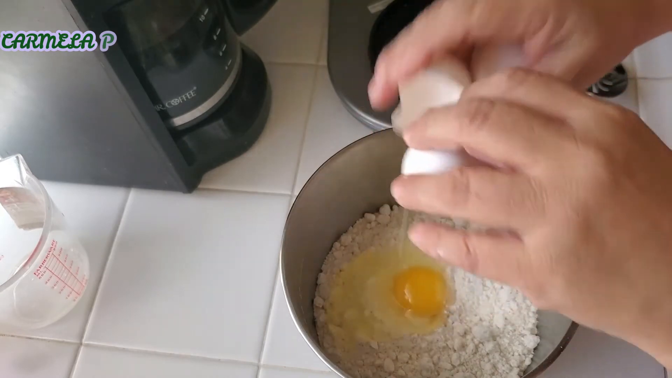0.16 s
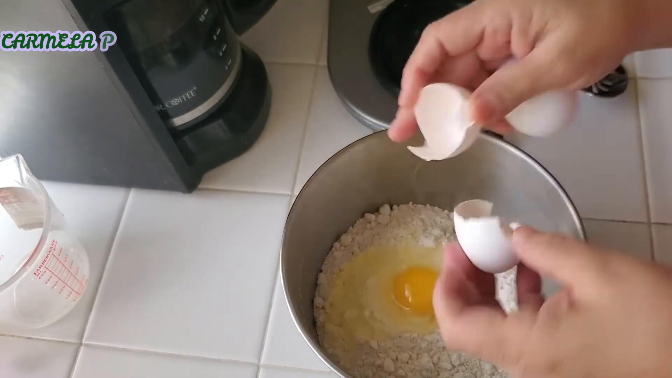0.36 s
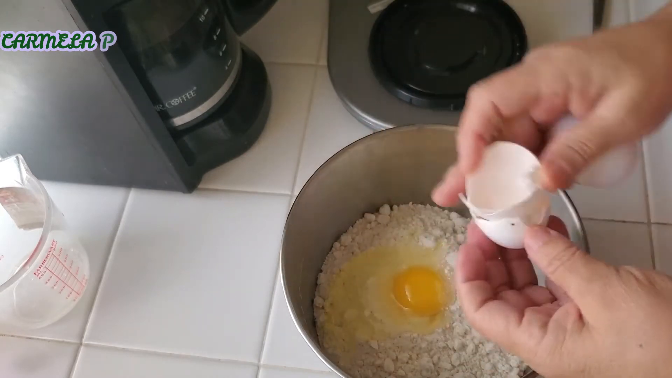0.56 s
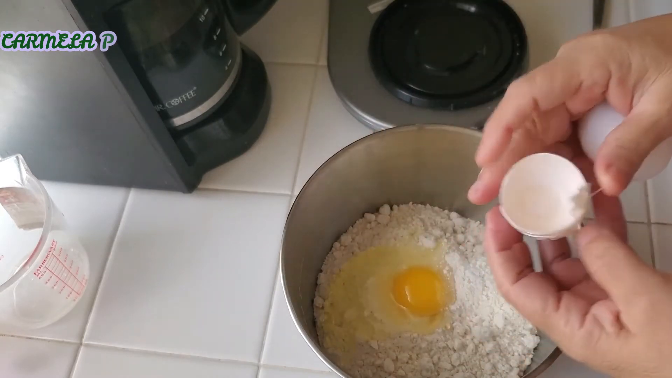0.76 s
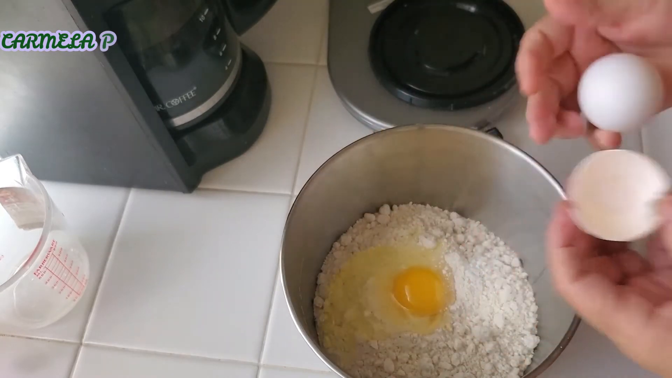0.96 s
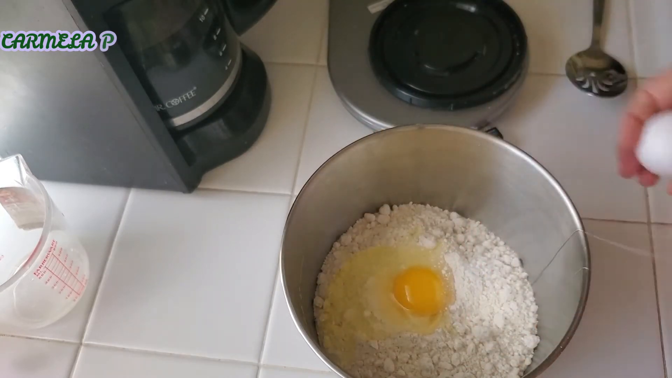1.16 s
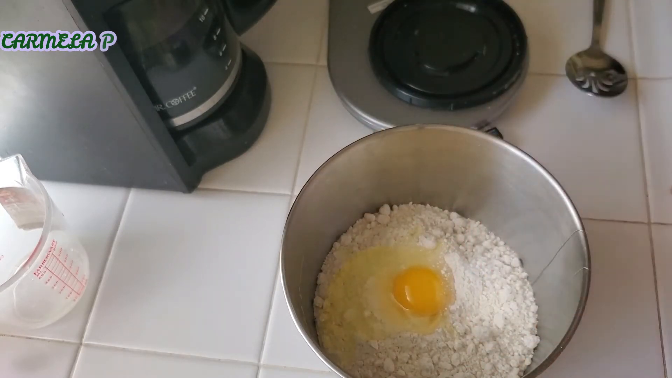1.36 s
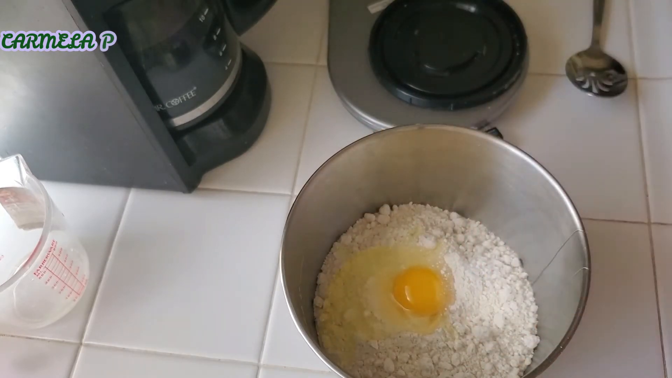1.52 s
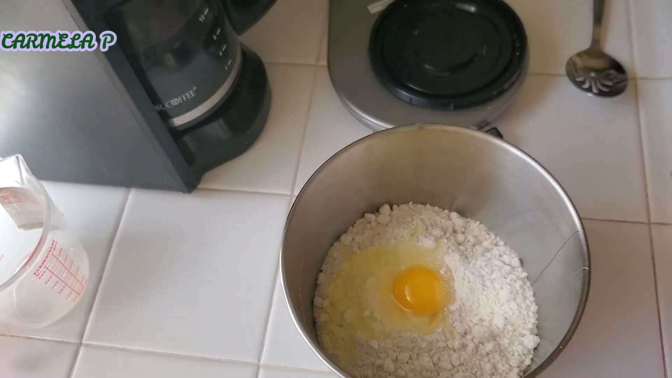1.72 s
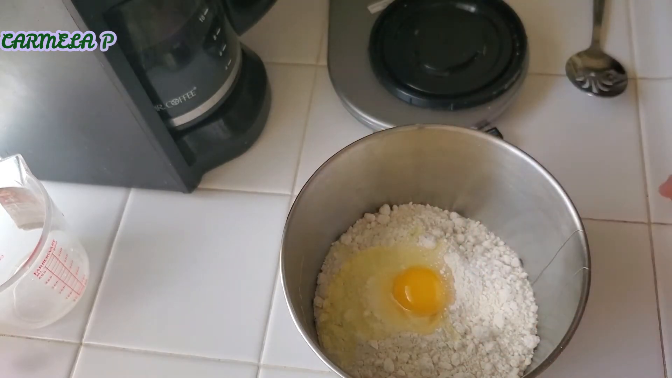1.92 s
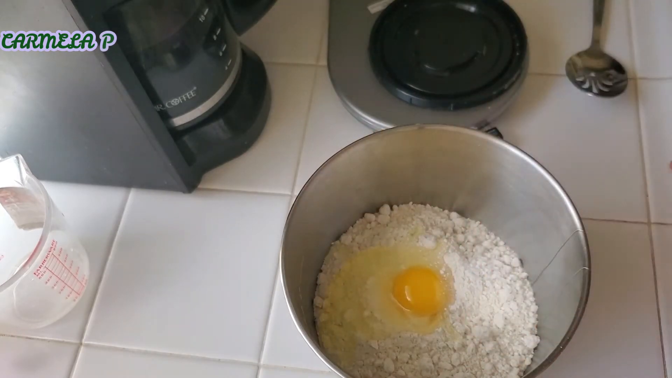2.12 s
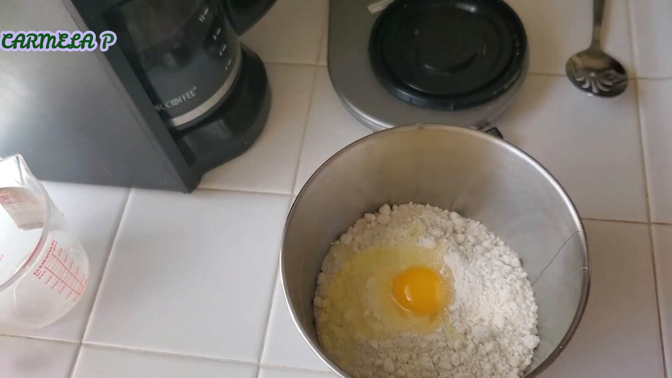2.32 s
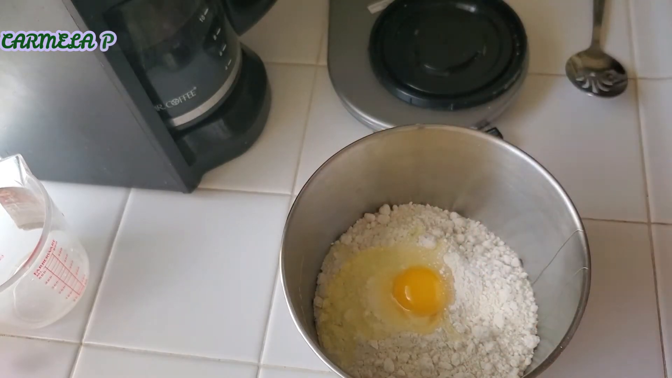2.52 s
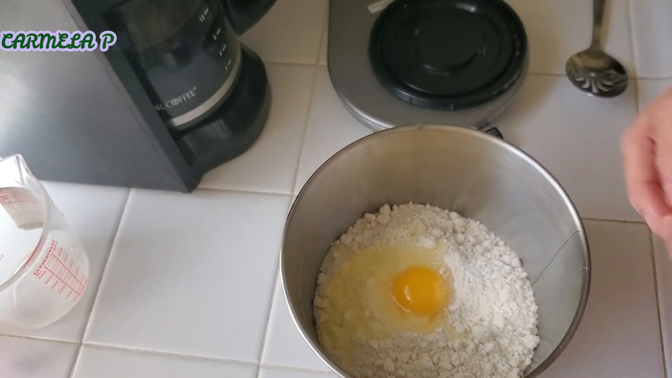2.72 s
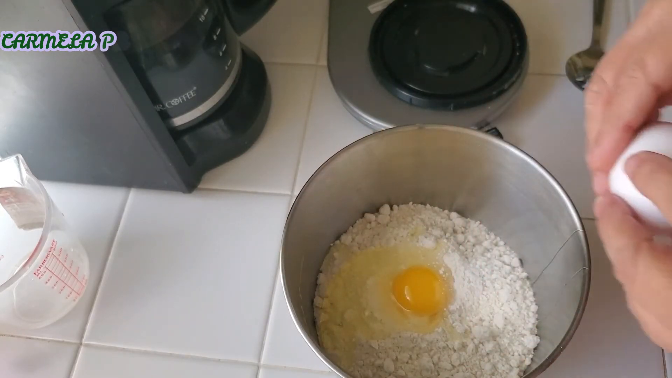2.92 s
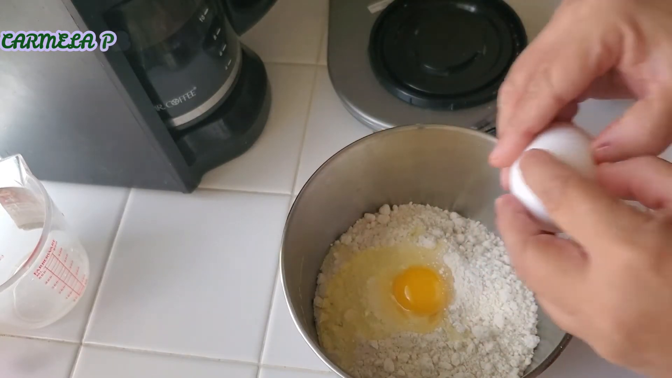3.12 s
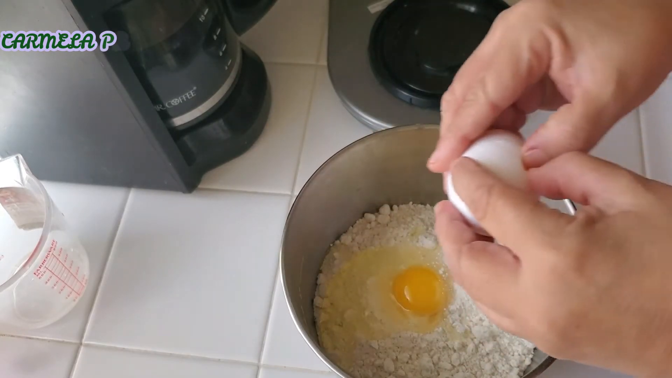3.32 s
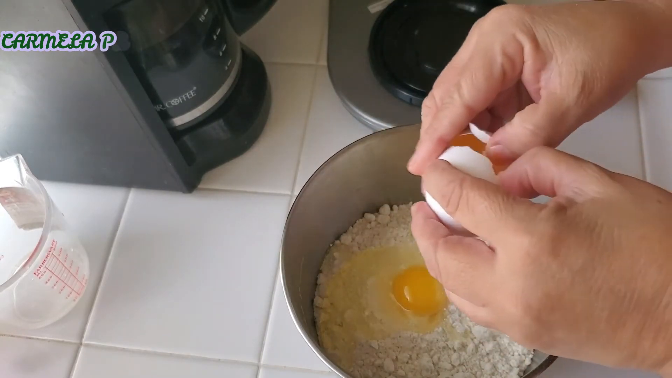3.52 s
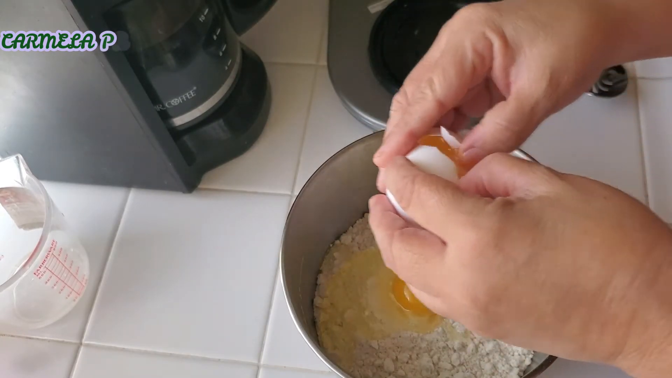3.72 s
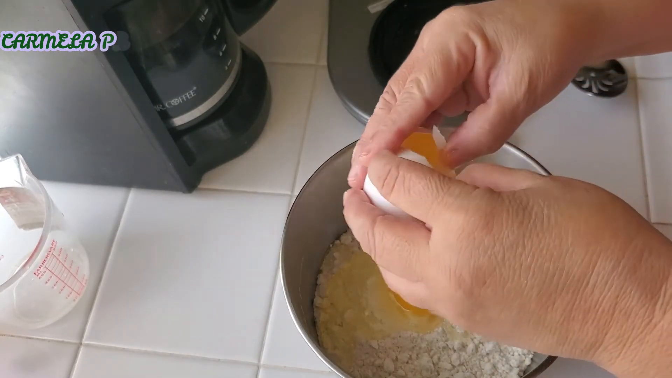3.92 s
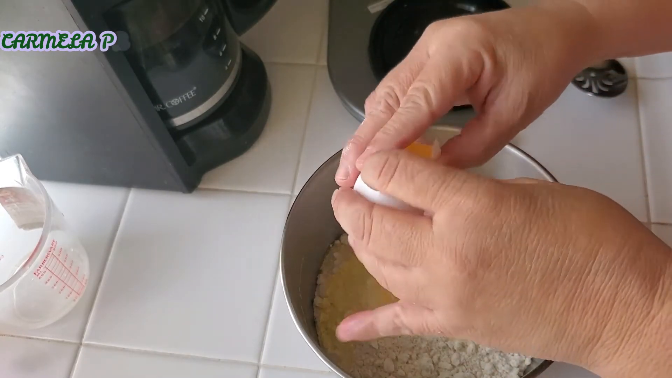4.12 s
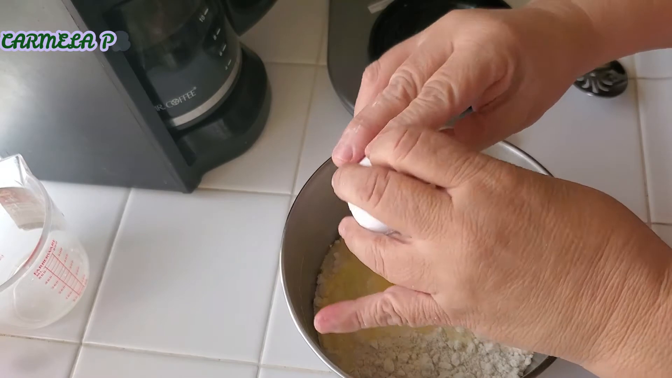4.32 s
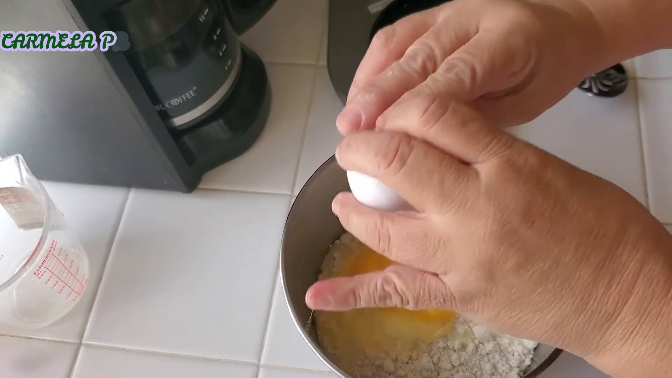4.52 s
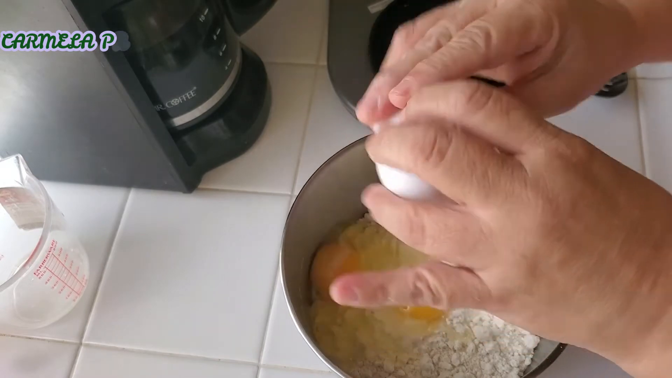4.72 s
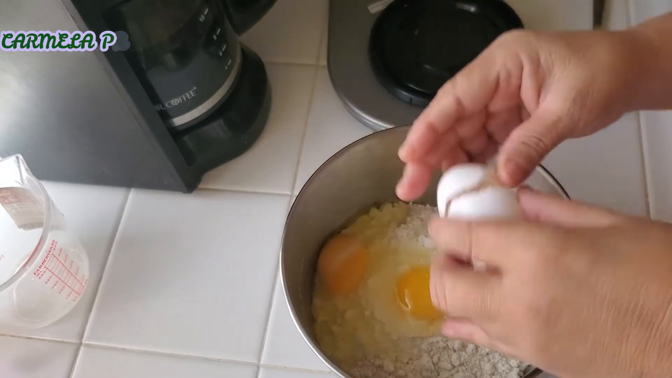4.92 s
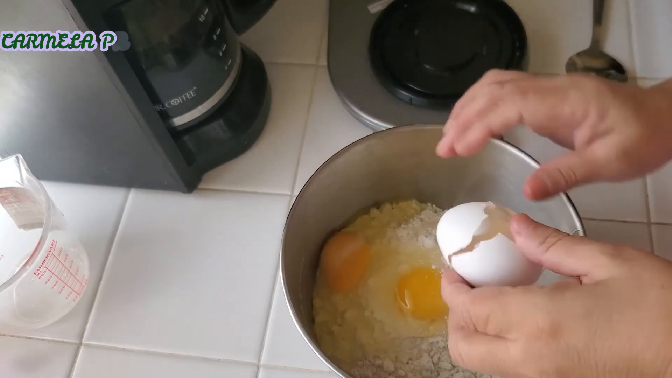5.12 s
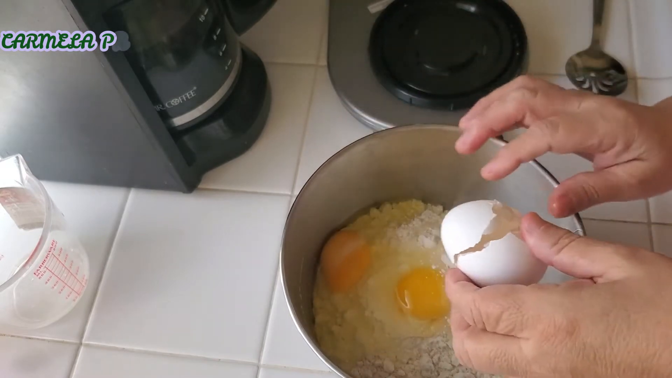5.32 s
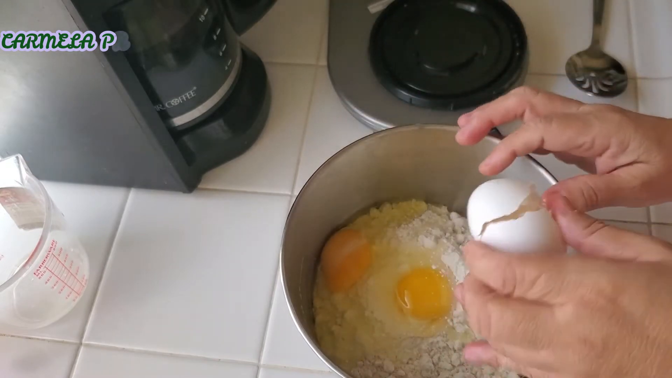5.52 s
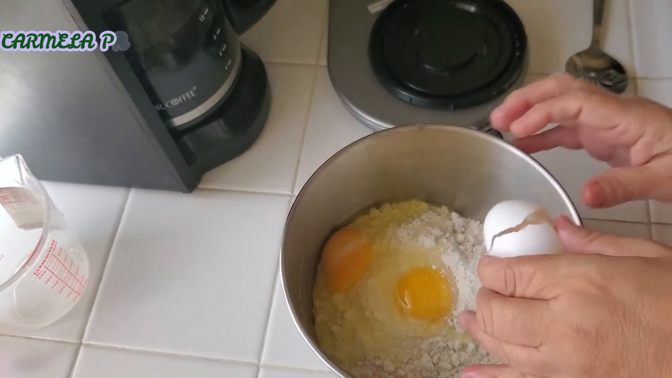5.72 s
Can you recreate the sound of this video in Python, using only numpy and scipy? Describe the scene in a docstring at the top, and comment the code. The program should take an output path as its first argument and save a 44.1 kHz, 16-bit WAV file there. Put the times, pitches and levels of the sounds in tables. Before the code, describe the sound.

An eggshell snaps, a fresh egg is knocked on the counter four times, then pried open with brittle crackling and soft finger rubbing.

```python
"""Sharp, hollow eggshell cracks, dull knocks and a soft rubbing of skin in a small tiled kitchen.
Hands break eggs over a bowl of flour: an empty shell is put down, a fresh egg is knocked on the counter
beside the microphone, then prised open. Short noise bursts excite resonances of shell, air and counter;
decaying noise gives the tiles' answer. Shaped noise makes rubbing, rumble and hiss; a sine the mains hum."""
import sys
import numpy as np
from scipy import signal
from scipy.fft import rfft, irfft, next_fast_len
from scipy.io import wavfile
from scipy.ndimage import uniform_filter1d, map_coordinates

SR = 44100
rng = np.random.default_rng(int(sys.argv[2]) if len(sys.argv) > 2 else 0)


def output_pcm(signal):
    """Save a mono or channel-first signal as 16-bit PCM at the path in sys.argv[1].

    Samples are clipped to [-1, 1] before scaling.
    """
    pcm = np.clip(np.atleast_2d(signal).T, -1, 1) * 32767
    wavfile.write(sys.argv[1], SR, np.round(pcm).astype(np.int16))


N = 254016  # samples in the scene
SPAN = 2 ** 15  # samples computed for one impact and its echo
CRACK_ECHO_DB = -2.5  # room against the direct sound of cracks and crackle

# correlation of left and right in the background noise: frequency_hz, likeness (1 = identical)
NOISE_LIKENESS = [(60, .92), (130, 0.86), (290, 0.61), (640, 0), (1400, 0)]


def amp(db):
    """Level to amplitude: 20 dB is a factor of ten."""
    return 10 ** (np.asarray(db) / 20)


def unit(x):
    """Normalization to a root mean square of one."""
    return x / np.sqrt(np.mean(x ** 2) + 1e-20)


def along(points, hz):
    """Interpolation of (frequency_hz, value) points on a logarithmic frequency axis."""
    f, v = np.transpose(points)
    return np.interp(np.log(hz + 1), np.log(f + 1), v)


def wobble(rate):
    """Slow random modulation: a smooth curve through rate Gaussian knots a second."""
    knots = rng.standard_normal(int(N * rate / SR) + 4)
    return map_coordinates(knots, [np.arange(N) * rate / SR])


def filtered(x, response):
    """Linear filtering: the spectrum of x times a response of frequency."""
    m = next_fast_len(x.shape[-1] + 8192)
    spectrum = rfft(x, m) * response(np.fft.rfftfreq(m, 1 / SR))
    return irfft(spectrum, m)[..., :x.shape[-1]]


def ring(f, modes):
    """Modal superposition: damped resonances (pitch_hz, width_hz, level_db) of alternating sign."""
    total = 0
    for k, (c, width, db) in enumerate(modes):
        resonance = 1j * f * width / (c * c - f * f + 1j * f * width)
        total = total + (-1) ** k * amp(db) * resonance
    return total


def paired(pair, spectrum, likeness):
    """Interchannel coherence: two unrelated noises mix as mid and side to a set left-right correlation."""
    turn = lambda f: np.arccos(np.clip(along(likeness, f), -1, 1)) / 2
    weights = lambda f: amp(along(spectrum, f)) * [np.cos(turn(f)), np.sin(turn(f))]
    mid, side = filtered(pair, weights)
    return np.array([mid + side, mid - side])


def hiss():
    """Stationary broadband noise: a random signal shaped by a spectrum, most alike left and right in the bass."""
    # background spectrum: frequency_hz, density_db (per Hz, relative)
    noise_spectrum = [(60, -25.5), (110, -5.5), (182, -14), (260, -18.5), (358, -25), (553, -37),
                      (1010, -39.5), (2600, -46.5), (4000, -57), (6800, -47.5), (9000, -62), (16500, -64.5)]
    noise = unit(paired(rng.standard_normal((2, N)), noise_spectrum, NOISE_LIKENESS))
    return amp(-65 + 1.5 * wobble(4.3)) * noise


def rumble():
    """Band-limited noise: a narrow bass band whose level rises and falls."""
    # course of the low rumble: time_s, level_db
    rumble_course = [(0, -69.5), (0.602, -72.5), (1.2, -61.5), (2.6, -68.5), (3.698, -68), (4.5, -61.5),
                     (5.28, -67.5), (5.55, -64.5), (5.72, -53)]
    s, level_db = np.transpose(rumble_course)
    band = [(20, -28.0), (55, 4), (95, -4), (130, -33.5)]  # frequency_hz, level_db
    noise = unit(paired(rng.standard_normal((2, N)), band, NOISE_LIKENESS))
    swell_db = np.interp(np.arange(N) / SR, s, level_db) + 0.83 * wobble(9)
    return amp(swell_db) * noise


def hum():
    """Frequency modulation: the mains tone is a sine whose pitch and level waver."""
    # mains hum: pitch_hz, level_db, width_hz (scales the pitch drift)
    hum_tone = (119.6, -62, 6)
    hz, db, width = hum_tone
    phase = 2 * np.pi * np.cumsum(hz + 0.18 * width * wobble(1.8)) / SR
    tone = np.sqrt(2) * amp(db + 1.5 * wobble(8.8)) * np.sin(phase)
    return tone * amp([[.3], [-.3]])  # slightly louder on the left


def strokes(quicker=1):
    """Exponential envelopes: gains of swish, hollow and crackle, their strokes summed as energies."""
    # finger strokes on the shell: start_s, length_s, swish_db, hollow_db, crackle_db
    finger_strokes = [(0.515, .05, -96, -76, -88), (0.568, 0.053, -78.5, -56, -51.5),
                      (0.654, 0.14, -81, -78, -76.5), (1.02, 0.069, -63, -71.5, -90),
                      (1.081, 0.11, -55, -61, -93), (1.226, 0.12, -62.5, -66.5, -96.5),
                      (1.7, 0.43, -66, -64.5, -98.5), (2.3, .3, -66.5, -63.5, -96.5),
                      (2.88, 0.049, -72, -74, -101), (3.48, 0.12, -85, -73.5, -55),
                      (3.72, 0.091, -72, -72, -74), (3.86, 0.14, -64, -55.5, -55.5),
                      (4.3, 0.19, -70, -68.5, -60.5), (4.55, 0.4, -71, -71, -63),
                      (4.82, 0.099, -60.5, -60, -62), (5.14, 0.074, -67.5, -96, -72),
                      (5.438, 0.23, -71, -85, -98)]
    swell, fade = quicker * 251.5, quicker * 148.5  # dB per second
    t = np.arange(N) / SR
    energy = 0
    for s, length, *levels_db in finger_strokes:
        shape_db = -swell * np.clip(s - t, 0, None) - fade * np.clip(t - s - length, 0, None)
        energy = energy + amp(shape_db + np.array(levels_db)[:, None]) ** 2
    return np.sqrt(energy)


def rub():
    """Sliding friction: skin moves on shell in uneven grains, and part of it sounds the air in the halves."""
    # sliding skin: frequency_hz, density_db (per Hz, relative)
    swish_spectrum = [(880, -29), (1500, -18), (3690, -3.5), (6000, -5), (6630, -1), (8080, -9),
                      (14900, -6.5), (16000, -12.5)]
    # air in the shell halves: pitch_hz, width_hz, level_db (the response is squared below)
    cup_modes = [(1455.3, 2000, 3), (2040, 2400, 2)]
    swish_gain, hollow_gain, _ = strokes()
    grains = lambda depth_db: rng.standard_normal((2, N)) * amp(depth_db * wobble(37))
    swish = unit(filtered(grains(depth_db=0.8), lambda f: amp(along(swish_spectrum, f))))
    hollow = unit(filtered(grains(depth_db=1.5), lambda f: ring(f, cup_modes) ** 2))
    return swish_gain * swish + hollow_gain * hollow


def tiles():
    """Frequency-dependent reverberation: stereo noise decays at its own speed in each band; a spectrum."""
    # reverberation of the room: frequency_hz, t60_s
    decay_times = [(80, 0.57), (200, 0.16), (530, 0.28), (1400, 0.28), (3700, 0.28), (9700, 0.18)]
    # correlation of left and right in the echo: frequency_hz, likeness
    echo_likeness = [(60, 1), (125, .93), (250, 0.95), (500, 0.59), (1000, -0.11), (2000, 0.2),
                     (8000, -0.22)]
    hz, t, z = signal.stft(rng.standard_normal((2, SPAN // 2)), SR, nperseg=256)
    t60 = np.clip(along(decay_times, hz), .05, 2)[:, None]
    tail = signal.istft(z * amp(-60 * t / t60), SR, nperseg=256)[1]
    tail = paired(tail, [(70, -5), (220, 0)], echo_likeness)  # a small room gives back little bass
    late = np.pad(tail / np.linalg.norm(tail[0]), ((0, 0), (90, 0)))  # starts 90 samples after the direct sound
    return rfft(late[:, :SPAN // 2], SPAN)


def crackle():
    """Poisson-like impulses: countless small cracks under the fingers, each favouring one resonance."""
    # ring of small cracks: pitch_hz, width_hz, level_db
    chip_modes = [(1520, 67, 0), (2090, 83, -3.5), (3624, 210, -7.5), (6700, 900, -5.5)]
    rate, spread_db = 270, 7.5  # cracks a second, scale of their random size
    chance, size = rng.random(N), np.clip(rng.exponential(size=N), 0, 3.5)
    pick = rng.integers(len(chip_modes), size=N)
    ticks = (chance < rate / SR) * amp(spread_db * size)
    chips = 0
    for k, mode in enumerate(chip_modes):
        share = np.where(pick == k, 1, .25)
        chips = chips + filtered(ticks * share, lambda f: ring(f, [mode]))
    chips = unit(chips) * strokes(quicker=4)[2]  # cracking starts and stops more abruptly than the slide
    echo = signal.fftconvolve(chips[None], irfft(tiles()), axes=1)[:, :N]
    return chips + amp(CRACK_ECHO_DB) * echo


def add(out, s, layers, length, lag, pan_db, echo):
    """Source-filter excitation: a burst of tiny fractures drives each (level_db, response); the room answers."""
    u = np.arange(8192) / SR / max(length, 2e-4)
    fractures = rng.standard_normal(len(u)) * amp(3.5 * rng.standard_normal(len(u)))
    push = rfft(fractures * np.sqrt(u) * np.exp(-2 * u), SPAN)
    # fractures push all frequencies alike
    push = push / np.sqrt(uniform_filter1d(np.abs(push) ** 2, size=150) + 1e-9)
    f = np.fft.rfftfreq(SPAN, 1 / SR)
    sound = 0
    for db, response in layers:
        layer = push * response(f)
        level = np.sqrt(SR / 200 / np.mean(np.abs(layer) ** 2))  # 0 dB: the energy of unit rms over 5 ms
        sound = sound + amp(db) * layer * level
    delay = np.exp(-2j * np.pi * f * np.array([[lag], [0]]))  # the left port hears later
    direct = amp([[pan_db / 2], [-pan_db / 2]]) * delay
    heard = irfft(sound * (direct + echo))
    heard[:, -SPAN // 4:] = 0
    start = round(s * SR)
    out[:, start:start + SPAN] += heard


def shell_layers(snap_db, hollow_db, hollow, shell_hz, shell_db, edge_db, sharpness):
    """Parallel radiators: air hollow, flexing shell, bright edge of the break and a broad snap under them."""
    return [(hollow_db, hollow),
            (shell_db, lambda f: ring(f, [(shell_hz, shell_hz / max(sharpness, 1), 0)])),
            (edge_db, lambda f: ring(f, [(9860, 31000, 0)]) ** 2),
            (snap_db, lambda f: ring(f, [(4080, 21200, 0)]) ** 3)]


def cracks():
    """Brittle fracture and cavity resonance: thumbs tear the shell with a dull push; both halves sound hollow."""
    # cracks of the shell: start_s, strength_db (reference for snap and push), hollow_db,
    # shell_hz, shell_db, edge_db
    shell_cracks = [(0.5544, -18, -29, 2506, -26, -34), (0.5653, -9.5, -33, 3300, -55.5, -56.5),
                    (0.5894, -11, -32.5, 5900, -41, -49.5), (0.9677, -56, -73, 5800, -61.5, -80),
                    (1.7653, -18.5, -50, 5500, -40.5, -59.5), (3.2294, -55, -88, 7000, -65.5, -72),
                    (3.3089, -58.5, -95, 6950, -64, -74.5), (3.463, -50, -70, 6500, -65, -55.5),
                    (3.483, -24.5, -54, 7200, -45, -62), (3.4958, -25, -56, 6300, -41, -42.5),
                    (3.5114, -36, -78, 6400, -57, -45), (3.5174, -17.5, -68, 3930, -58, -62),
                    (3.5313, -13, -42, 3630, -34.5, -30), (3.5421, -35, -63, 3440, -62, -53),
                    (3.6264, -53, -70, 6780, -66, -49.5), (3.721, -55, -55, 2910, -57.5, -85),
                    (3.8033, -48, -55, 4080, -62, -76), (3.8276, -47, -45, 3920, -55, -64),
                    (3.8337, -28, -37, 7000, -45.5, -48), (3.8746, -27.5, -62, 4530, -48.5, -46),
                    (3.904, -45, -55, 6910, -70, -54), (3.9183, -31, -42, 6150, -45, -41),
                    (3.9279, -17, -42.5, 2750, -45, -47), (3.9711, -44, -40.5, 6400, -42, -38),
                    (3.976, -13.5, -32.5, 6830, -26, -29.5), (4.003, -44, -49, 6970, -63, -49),
                    (4.059, -39, -57, 6930, -52, -39), (4.0745, -33, -44, 3620, -52, -53),
                    (4.1138, -39, -55, 7040, -54, -32.5), (4.1234, -35, -47, 7100, -58, -51),
                    (4.136, -31, -55, 6800, -49, -59), (4.1501, -42.5, -41, 6860, -47, -55),
                    (4.1734, -25, -31.5, 4500, -29, -29), (4.1958, -26, -28.5, 4430, -36, -25),
                    (4.2009, -8, -32, 6400, -31.5, -41), (4.37, -40, -66, 6930, -71, -73),
                    (4.3974, -30, -53.5, 3470, -68, -55), (4.4285, -6, -30.5, 3560, -36, -42),
                    (4.4507, -9, -59, 5940, -33.5, -33.5), (4.5731, -20, -56, 3300, -48, -64),
                    (4.6039, -19, -40.5, 3240, -51, -53), (4.6188, -40, -43, 2740, -49, -72),
                    (4.6672, -29, -54, 3340, -59, -45.5), (4.7521, -57, -54.5, 6940, -52, -43.5),
                    (4.795, -19, -40, 6900, -42, -34), (4.808, -3.5, -31.5, 5900, -42, -43),
                    (4.8485, -25, -38.5, 3460, -45, -46), (4.8609, -22, -40.5, 4000, -45, -54),
                    (4.9199, -15.5, -51, 3900, -50, -70), (4.9483, -26, -45.5, 7000, -46, -51),
                    (4.9939, -22, -51, 6540, -69, -76), (5.1355, -55, -70.5, 7150, -52, -80),
                    (5.1603, -20.5, -43, 6900, -42.5, -50), (5.3848, -77.5, -65.5, 7220, -61.5, -88),
                    (5.5163, -65, -63.5, 6800, -50, -85), (5.6631, -42.5, -55.5, 4080, -62.5, -65),
                    (5.697, -59, -49, 7070, -58, -46.5)]
    # shell in the hands: time_s, pitch_hz (air in the halves), push_db (thumbs, against the strength)
    hand_grip = [(0.551, 2224, -41.5), (.97, 1900, -28), (1.77, 1000, -44), (3.5, 1000, -33),
                 (3.532, 1790, -30), (3.7, 1950, -35), (3.83, 2110, -27.5), (3.97, 1840, -53),
                 (4.06, 1760, -71), (4.198, 1930, -51), (4.6, 2050, -42.5), (4.81, 1930, -48),
                 (4.861, 1303, -31), (5, 1350, -60), (5.5, 1270, -40), (5.701, 1274, -32)]
    snap_re_strength_db = -25.5
    # tearing time at -21 dB strength in s, its log growth per dB, its log scatter
    tear_s, tear_growth, tear_scatter = 0.0035, 0.0088, .4
    out = np.zeros((2, N + SPAN))
    at, pitch, push_db = np.transpose(hand_grip)
    rooms = [tiles() for _ in range(14)]  # separate answers of the room, taken in turn
    for k, (s, strength_db, hollow_db, shell_hz, shell_db, edge_db) in enumerate(shell_cracks):
        hz = np.interp(s, at, pitch)
        scatter = tear_scatter * rng.standard_normal()
        length = tear_s * np.exp(tear_growth * (strength_db + 21) + scatter)
        cavities = lambda f: ring(f, [(0.74 * hz, hz / 8, -8), (hz, hz / 10, 0)])
        halves = lambda f: cavities(f) * ring(f, [(hz, 0.46 * hz, 0)])
        layers = shell_layers(strength_db + snap_re_strength_db, hollow_db, halves,
                              shell_hz, shell_db, edge_db, sharpness=13.0)
        thumb_db = strength_db + np.interp(s, at, push_db)
        layers += [(thumb_db, lambda f: ring(f, [(590, 1700, 0)]) ** 2)]
        echo = amp(CRACK_ECHO_DB) * rooms[k % len(rooms)]
        add(out, s, layers, length, lag=.00006, pan_db=5.5, echo=echo)
    return out[:, :N]


def knocks():
    """Impact excitation: blows shake counter, cupboard and bowl and dent the shell; bumps only thud."""
    # cupboard under the counter: pitch_hz, width_hz, level_db
    cupboard_modes = [(52, 9.7, -1.5), (88, 18, -0.5)]
    # counter top: pitch_hz, width_hz, level_db
    wood_modes = [(208, 76, -3.5), (271, 49, 0.5), (393, 39, 0), (488, 323, -1.5), (593, 388, -4)]
    # thin ring of the steel bowl: pitch_hz, width_hz, level_db
    bowl_modes = [(3510, 5, 0), (3570, 6, -3), (3620, 8, -6)]
    # hard blows on the counter: start_s, snap_db, boom_db, wood_db, hollow_hz, hollow_db,
    # shell_hz, shell_db, shell_sharpness (pitch over width), bowl_db, contact_s
    hard_blows = [(1.375, -59, -26.5, -19.5, 1340, -38, 5220, -42.5, 23, -74, 0.0079),
                  (1.634, -27, -30, -32.5, 1130, -23.5, 5780, -26, 10, -71, 0.0021),
                  (1.907, -25, -29, -32, 1400, -32.5, 6230, -27, 7.4, -67, 0.0039),
                  (2.201, -16, -38.5, -31.5, 1300, -26, 3610, -16.5, 8.6, -25, 0.0048)]
    # soft bumps after the last blow: start_s, snap_db, wood_db, hollow_hz, hollow_db, contact_s
    soft_bumps = [(2.247, -27, -34, 1090, -33.5, 0.014), (2.287, -34, -37, 870, -32.5, 0.041),
                  (2.33, -64, -49, 1610, -38, 0.0081), (2.476, -78, -50.5, 1460, -44.5, 0.019),
                  (2.502, -80, -41, 804, -40, 0.024), (2.629, -92, -49.5, 944, -48.5, 0.012),
                  (2.655, -80, -42, 816, -48, 0.013), (2.878, -58, -57, 935, -60.5, 0.042)]
    edge_re_snap_db, boom_re_wood_db = -21, -12.5  # edge of a blow's break; cupboard under a bump
    blow_echo_db, bump_echo_db = 3.5, 0  # room against the direct sound
    out = np.zeros((2, N + SPAN))
    air = lambda hz: lambda f: ring(f, [(hz, hz / 3, 0)])
    cupboard = lambda f: ring(f, cupboard_modes)
    wood = lambda f: ring(f, wood_modes)
    bowl = lambda f: ring(f, bowl_modes)
    soft_snap = lambda f: ring(f, [(4445, 15000, 0)]) ** 2
    for (s, snap_db, boom_db, wood_db, hz, hollow_db,
         shell_hz, shell_db, sharpness, bowl_db, contact_s) in hard_blows:
        layers = shell_layers(snap_db, hollow_db, air(hz), shell_hz, shell_db,
                              snap_db + edge_re_snap_db, sharpness)
        layers += [(boom_db, cupboard), (wood_db, wood), (bowl_db, bowl)]
        add(out, s, layers, contact_s, lag=0.00016, pan_db=5.0, echo=amp(blow_echo_db) * tiles())
    for s, snap_db, wood_db, hz, hollow_db, contact_s in soft_bumps:
        layers = [(hollow_db, air(hz)), (snap_db, soft_snap),
                  (wood_db + boom_re_wood_db, cupboard), (wood_db, wood)]
        add(out, s, layers, contact_s, lag=0.00017, pan_db=5.0, echo=amp(bump_echo_db) * tiles())
    return out[:, :N]


def scene():
    """Linear superposition: the pressures of all sources add."""
    background = hiss() + rumble() + hum()
    return background + rub() + crackle() + cracks() + knocks()


def record(dry):
    """Transducer response: the microphone dulls the treble; the recorder keeps nothing above its band limit."""
    treble = [(9000, -0.5), (13000, -6), (15500, -5)]  # frequency_hz, level_db
    heard = filtered(dry, lambda hz: amp(along(treble, hz)))
    limit_hz = 15850  # above it the level falls 1 dB every 10 Hz, down to -160 dB
    return filtered(heard, lambda hz: amp(-np.clip(hz - limit_hz, 0, 1600) / 10))


dry = scene()
out = record(dry)
output_pcm(out)
```